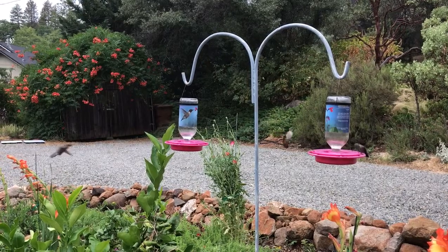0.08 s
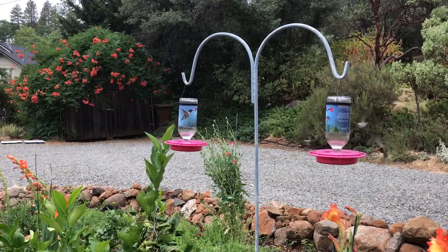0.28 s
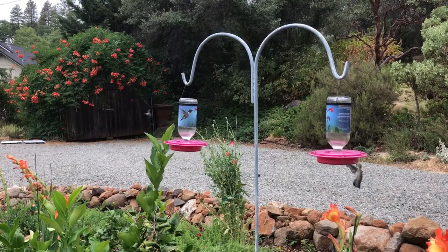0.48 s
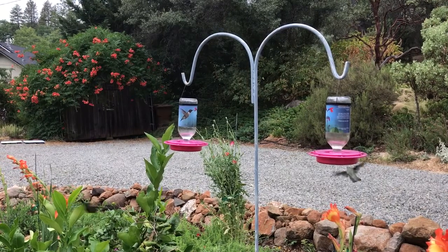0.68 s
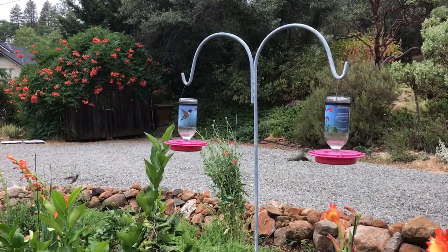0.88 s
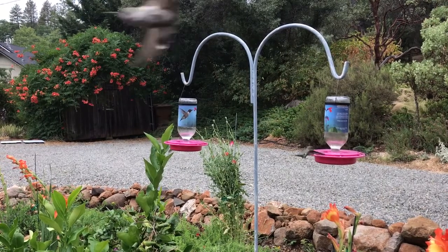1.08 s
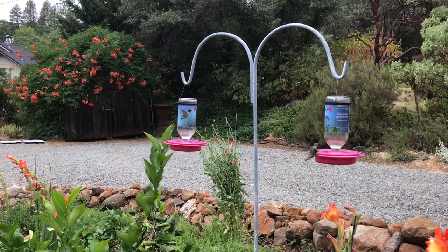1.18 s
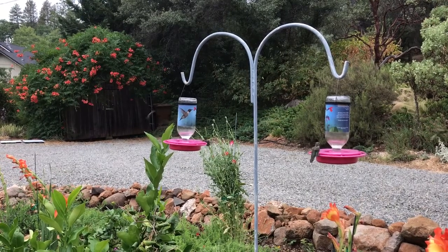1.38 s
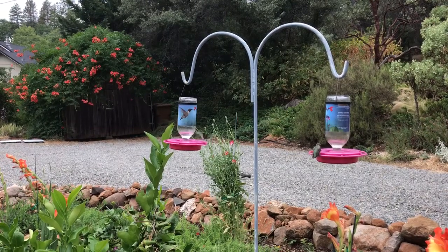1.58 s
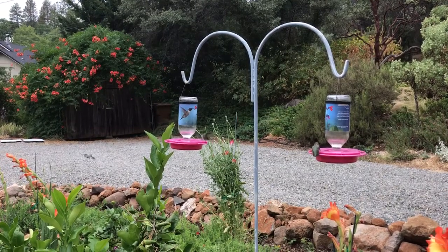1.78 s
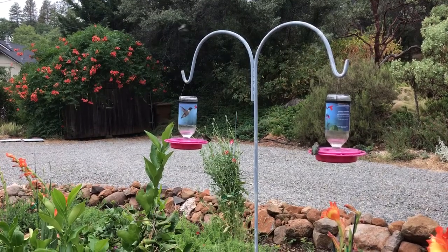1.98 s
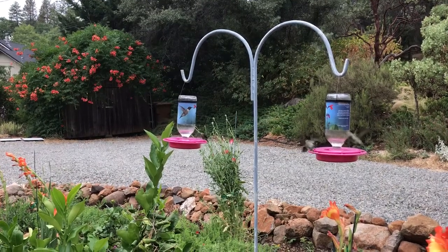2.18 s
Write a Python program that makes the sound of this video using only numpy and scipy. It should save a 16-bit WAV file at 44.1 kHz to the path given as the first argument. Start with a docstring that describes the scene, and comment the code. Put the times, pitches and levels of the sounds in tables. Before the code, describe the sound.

Hummingbirds chatter close by, opening with a thin chirp and a sharp squeal at 0.25 seconds. Rapid, high rattles and warbled chirps crowd together until 0.9, with one tiny dry tick near 0.5. Softer chirps and buzzes follow until 1.7, then one sharp chip at 1.85. Wings hum low throughout, loudest near 1.2 as a bird darts past. The calls echo faintly over a soft garden hush.

```python
"""Hummingbird chase at the feeders

Hummingbirds chase each other round garden feeders, close up and in mono. Their calls are thin
whistles swept very fast: warbled chirps, rattles, buzzes, a squeal and one sharp chip.
Wings hum throughout and swell as a bird darts past. Underneath lie a second bird's hover,
one dry tick and the soft hush of the garden, which gives the calls a faint echo."""
import sys
import numpy as np
from scipy import signal
from scipy.fft import rfft, irfft, next_fast_len
from scipy.io import wavfile
from scipy.ndimage import uniform_filter1d, map_coordinates

SR = 44100
rng = np.random.default_rng(int(sys.argv[2]) if len(sys.argv) > 2 else 0)


def digitize_waveform(pressure):
    """Quantize a signal to 16-bit integers and store it at the path in sys.argv[1].

    Rows of a 2-D input are taken as channels; values are limited to [-1, 1].
    """
    field = np.atleast_2d(pressure).T
    bounded = np.clip(field, -1, 1)
    quanta = np.round(bounded * 32767).astype(np.int16)
    wavfile.write(sys.argv[1], SR, quanta)


N = 97020
T = np.arange(N) / SR

# Colour of the garden's noise bed (frequency [Hz], gain [dB])
HUSH_EQ = [(25, -36), (45, -1.5), (85, 1), (170, -5.5), (270, -8.5), (400, -28), (550, -26), (1000, -21.5),
           (2000, -25.5), (4000, -27), (6500, -27.5), (8500, -32.5), (10500, -35), (13000, -31.5),
           (16000, -40)]
# Decay of the echo from the trees (frequency [Hz], time to fall 60 dB [s])
ECHO_DECAY = [(1000, 0.19), (7000, 0.64), (15000, 0.4)]
# Colour of that echo (frequency [Hz], gain [dB])
ECHO_EQ = [(1000, -15), (4000, 0), (6800, 1.5), (8800, 2.5), (11000, 1), (16000, -5)]
# Hum of the hovering bird (multiple of the stroke rate, level [dB])
HOVER_PARTIALS = [(1, -66), (2, -67.5), (3, -73.5)]
# Resonances of the tick (frequency [Hz], relative level [dB], time to fall 60 dB [s])
TICK_RESONANCES = [(950, -10, 0.014), (1070, -0.5, 0.014), (1840, -0.5, 0.013), (2360, 0, 0.011)]

# Wing speed, two strokes to a beat (time [s], stroke rate [Hz])
STROKE_RATE = [(0, 85), (.2, 83), (.32, 89), (.4, 93.6), (.49, 97.5), (.57, 106), (.68, 100.3), (.78, 106),
               (.87, 82.7), (.93, 89.5), (1.02, 98.5), (1.14, 84.2), (1.23, 95), (1.36, 89.5), (1.56, 80),
               (1.72, 90), (1.9, 79), (2.2, 87.5)]
# Wing faders, each ahead of a trim (time [s], stroke tone [dB], overtones and flutter [dB], swish [dB])
WING_FADERS = [(0, -63, -69, -70), (.1, -60.5, -66, -73), (.24, -74, -65, -69.5), (.39, -52, -56, -68),
               (.44, -58.5, -61.5, -67.5), (.6, -52, -53, -61.5), (.68, -51, -54, -66.5),
               (.79, -61.5, -66.5, -70), (.86, -47.5, -51, -61.5), (.92, -54, -57, -71.5),
               (.99, -49, -53.5, -65), (1.11, -62.5, -47.5, -58), (1.18, -40, -44.5, -61.5),
               (1.235, -42.5, -48.5, -63), (1.28, -67, -62, -76), (1.36, -66, -58.5, -71),
               (1.45, -66, -63, -71.5), (1.65, -55.5, -61, -72), (1.78, -68.5, -61, -72),
               (1.92, -69, -67.5, -72.5), (2.2, -67, -57.5, -72.5)]
# Unequal up- and downstrokes sound at half the stroke rate (time [s], fader ahead of a trim [dB])
BEAT_FADER = [(0.0, -81), (0.27, -72), (0.39, -63), (0.51, -73), (0.71, -60), (0.77, -81), (0.88, -49.5),
              (0.96, -78), (1.12, -67), (1.17, -48), (1.38, -84), (1.56, -61), (1.61, -73), (1.66, -64),
              (2.05, -83), (2.2, -64)]
# Upper partials of the wing hum (multiple of the stroke rate, relative level [dB])
WING_PARTIALS = [(1.5, -8), (2, -4), (2.5, -13.5), (3, -13), (3.5, -18), (4, -15.5)]
# Low flutter of the stirred air (frequency [Hz], gain [dB])
FLUTTER_EQ = [(40, -52), (110, -11.5), (160, 3.5), (280, -8.5), (420, -5.5), (700, -26), (2000, -116)]
# Broad swish of the stirred air (frequency [Hz], gain [dB])
SWISH_EQ = [(100, -33), (350, -11), (600, -6), (1400, -8.5), (3000, -12.5), (8000, -19), (16000, -21.5)]

# How strongly the beak radiates each partial (frequency [Hz], gain [dB])
BEAK_EQ = [(1200, 10), (3000, -4.5), (5000, -5), (6800, 0), (9000, -1), (10500, -9), (12500, -8.5),
           (16000, -21)]
# Hoarseness of the voice (frequency [Hz], gain [dB])
RASP_EQ = [(1200, -9), (2800, -18.5), (4500, -1.5), (6800, -4), (10000, -2), (12500, 0), (14000, -14),
           (16000, -13.5)]
# Harmonics of each call ahead of the beak, fundamental first (gain [dB])
BUZZ_HARMONICS = [-4, -6]
RATTLE_HARMONICS = [-1, -2, -0.5, -10]
CHIRP_HARMONICS = [-1.5, -6.5, -30]
SQUEAL_HARMONICS = [1, 2, 4]
CHIP_HARMONICS = [-2, -1.5, 1.5, -27]
# Buzz cues (time [s], length [s], top pitch [Hz], gain [dB])
BUZZ_CUES = [(.543, 0.037, 7130, -44), (0.901, 0.0308, 7107, -46), (1.066, 0.033, 6910, -48),
             (1.143, 0.048, 7000, -47.5), (1.327, 0.0354, 7000, -44.5), (1.517, 0.031, 6820, -50.5)]
# Rattle cues (time [s], length [s], sweep rate [Hz], low pitch [Hz], high pitch [Hz],
# final gain [dB], swell up to it [dB])
RATTLE_CUES = [(.2805, 0.026, 370, 2010, 6400, -49, -3.5), (.4395, 0.059, 155, 1402, 7600, -38.5, 12),
               (.5508, 0.019, 165, 1765, 7300, -40, 1), (.7068, .0675, 165, 1583, 7830, -38, 7.5),
               (.7935, 0.063, 175, 1576, 7495, -41.5, 16)]
# Chirp cues (time [s], hold [s], rest after the dip [s], length [s], held pitch [Hz],
# starting gain [dB], fade over the call [dB], sink of the warble [share of pitch])
CHIRP_CUES = [(.094, 0.0082, .004, .038, 8300, -43, 14.5, 0.36),
              (.434, .009, 0.00057, 0.032, 8680, -37.5, 10, 0.37),
              (.626, 0.0068, 0.0013, 0.067, 8710, -37, 13, .36),
              (0.808, 0.0056, 0.0078, 0.044, 8670, -45.5, 4, .25),
              (.981, 0.0058, 0.00038, 0.051, 8510, -43.5, 6.5, 0.29),
              (1.234, .0055, 0.0008, 0.061, 8605, -43, 8.5, .25),
              (1.409, 0.0082, 0.0044, 0.067, 8406, -45.5, 7.5, 0.25),
              (1.601, 0.0076, 0.0046, 0.057, 8200, -47.5, 5, 0.23)]
# The squeal, a held whistle that breaks downward (time [s], pitch [Hz], gain [dB])
SQUEAL_PATH = [(.226, 8180, -74), (.231, 9300, -38.5), (.238, 9410, -34.5), (.241, 8820, -33),
               (.243, 9430, -31), (.2462, 9430, -28.5), (.248, 7930, -32), (.2503, 9760, -34),
               (.2523, 5580, -40.5), (.2543, 9220, -39.5), (.2565, 4800, -36.5), (.2585, 3850, -41.5),
               (.261, 4870, -56)]
# The chip, one steep fall (time [s], pitch [Hz], gain [dB])
CHIP_PATH = [(1.837, 7010, -75), (1.842, 7780, -46), (1.845, 7550, -35.5), (1.8475, 6950, -32),
             (1.8495, 5600, -28.5), (1.851, 4000, -33), (1.8528, 2488, -46.5), (1.855, 1596, -67)]


def amp(db):
    """Decibels to gain."""
    return 10 ** (np.asarray(db) / 20)


def unit(x):
    """Scale to rms 1."""
    return x / np.sqrt(np.mean(x ** 2) + 1e-20)


def along(points, hz):
    """Read (frequency, value) points on a log axis."""
    knots_hz, values = np.transpose(points)
    return np.interp(np.log(np.abs(hz) + 1), np.log(knots_hz + 1), values)


def curves(rows, t):
    """Each column of an automation table at the times t."""
    times, *columns = np.transpose(rows)
    return [np.interp(t, times, column) for column in columns]


def wobble(rate, t):
    """A smooth random curve, rate knots a second."""
    return map_coordinates(rng.standard_normal(1024), [t * rate], mode="wrap")


def filtered(x, response):
    """Equalise x with a gain given as a function of frequency."""
    size = next_fast_len(N + 8192)
    return irfft(rfft(x, size) * response(np.fft.rfftfreq(size, 1 / SR)), size)[:N]


def noise(eq):
    """Coloured noise of rms 1."""
    return unit(filtered(rng.standard_normal(N), lambda hz: amp(along(eq, hz))))


def add(out, start, x):
    """Mix x in at start seconds."""
    i = max(0, round(start * SR))
    out[i:i + len(x)] += x[:N - i]


def fade(t, length, attack, release):
    """Linear fade in and out, times in seconds."""
    return np.clip(t / attack, 0, 1) * np.clip((length - t) / release, 0, 1)


def hush():
    """The garden's bed: soft, steady noise, strongest in the lows."""
    return amp(-62) * noise(HUSH_EQ)


def garden_echoes(x, scatter_t60=0.075):
    """Two returns: quick scatter from feeders and ground, and a longer echo from the trees."""
    hz, t, spectrum = signal.stft(rng.standard_normal(SR // 2), SR, nperseg=256)
    decay = amp(-60 * t / along(ECHO_DECAY, hz)[:, None])
    trees = signal.istft(spectrum * decay, SR, nperseg=256)[1]
    t = np.arange(len(trees)) / SR
    trees *= np.clip(t / 0.0073, 0, 1)
    scatter = rng.standard_normal(len(t)) * amp(-60 * t / scatter_t60) * np.clip(t / 0.0021, 0, 1)
    return [signal.fftconvolve(x, impulse / np.linalg.norm(impulse))[:N] for impulse in (scatter, trees)]


def hovering(stroke_hz=90.67):
    """The faint, steady wing hum of a second bird at a feeder."""
    phase = 2 * np.pi * np.cumsum(stroke_hz * (1 + .06 * wobble(5, T))) / SR
    return np.sqrt(2) * sum(amp(db + 2.3 * wobble(7.16, T)) * np.sin(k * phase)
                            for k, db in HOVER_PARTIALS)


def tick(start=.4675, gain_db=-47.5):
    """One small dry tick in the middle of the squabble."""
    out, t = np.zeros(N), np.arange(SR // 20) / SR
    for hz, db, t60 in TICK_RESONANCES:
        add(out, start, amp(gain_db + db - 60 * t / t60) * np.sin(2 * np.pi * hz * t))
    return out


def wings(stroke_swing_db=2.5, beat_swing_db=2):
    """Wing strokes hum, and each stroke pushes out a puff of stirred air."""
    stroke_hz, = curves(STROKE_RATE, T)
    tone_db, overtone_db, swish_db = curves(WING_FADERS, T)
    beat_db, = curves(BEAT_FADER, T)
    phase = 2 * np.pi * np.cumsum(stroke_hz) / SR
    hum = amp(tone_db - 1.5) * np.sin(phase + 0.42 * wobble(15, T))
    hum += amp(beat_db + 2.5) * np.sin(phase / 2 + 0.55 * wobble(5, T))
    for k, db in WING_PARTIALS:
        hum += amp(overtone_db + db + 1.9 * wobble(14, T)) * np.sin(k * phase + .5 * wobble(18, T))
    puffs = unit(amp(stroke_swing_db * np.cos(phase) + beat_swing_db * np.cos(phase / 2)))
    flutter = amp(overtone_db - 5.5) * noise(FLUTTER_EQ)
    swish = amp(swish_db + 1.5) * noise(SWISH_EQ)
    return np.sqrt(2) * hum + puffs * (flutter + swish)


def rasp(t, mid_db, growth_db=19.5):
    """Hoarse noise in the voice, growing towards the end of a call."""
    return amp(mid_db + growth_db * (t / t[-1] - .5)) * noise(RASP_EQ)[:len(t)]


def whistle(hz, harmonics, rough):
    """The syrinx: a slightly unsteady tone and its overtones, coloured by the beak."""
    hz = hz * (1 + rough * wobble(1500, np.arange(len(hz)) / SR))
    phase = 2 * np.pi * np.cumsum(hz) / SR
    return np.sqrt(2) * sum(amp(db + along(BEAK_EQ, k * hz)) * (k * hz < SR / 2) * np.sin(k * phase)
                            for k, db in enumerate(harmonics, 1))


def buzzes(trill_hz=330, trill_depth=0.18, tremolo_depth=.78):
    """Soft trills, loudest at the top of each little arch of pitch."""
    out = np.zeros(N)
    for start, length, top_hz, db in BUZZ_CUES:
        t = np.arange(int(length * SR)) / SR
        trough = np.sin(np.pi * (trill_hz * t + .08 * wobble(78, t))) ** 2
        sag = 0.104 * (2 * t / length - 1) ** 2  # both ends of the call go flat
        pitch = top_hz * (1 - trill_depth * trough) * (1 - sag)
        level = amp(db) * (1 - tremolo_depth * trough) * fade(t, length, attack=0.007, release=0.003)
        voice = whistle(pitch, BUZZ_HARMONICS, rough=0.032) + rasp(t, mid_db=-18)
        add(out, start, level * voice)
    return out


def rattles(duty=.8, arch_s=.0055, arch_fall=0.73, shimmer_db=1.2):
    """Rows of pulses that shoot up in pitch; the last of a row stays open and arches down again."""
    out = np.zeros(N)
    for start, length, rate, low_hz, high_hz, db, swell_db in RATTLE_CUES:
        t = np.arange(int(length * SR)) / SR
        last_pulse = np.floor((length - arch_s / 2) * rate - .5)
        pulses = t * rate + 0.044 * wobble(150, t)  # loose timing
        cycle = pulses - np.minimum(np.floor(pulses), last_pulse)
        sweep = np.clip(cycle / duty, 0, 1)
        arch = np.clip((t - (last_pulse + duty / 2) / rate) / arch_s, 0, 2)
        pitch = low_hz + (high_hz - low_hz) * np.sin(np.pi * sweep * .52)  # bends just over its top
        pitch *= 1 - arch_fall * np.minimum(arch, 1) ** 2
        pitch *= 1 + .04 * wobble(250.6, t)
        gate = np.where(arch > 0, np.exp(-arch ** 2), np.abs(np.sin(np.pi * sweep ** 1.03)))
        level = amp(db - swell_db * (1 - t / length) ** 2 + shimmer_db * wobble(307, t))
        level *= fade(t, length, attack=0.0015, release=0.006)
        voice = whistle(pitch, RATTLE_HARMONICS, rough=0.039) + rasp(t, mid_db=-11.5)
        add(out, start, level * gate * voice)
    return out


def chirps(warble_hz=272, warble_depth=.32, trough_db=-2, shimmer_db=1.2):
    """A held note dips once, springs back higher, then warbles while it sinks and fades."""
    dip_s, dip_ratio, rebound_ratio = 0.0079, .62, 1.085
    out = np.zeros(N)
    for start, hold, rest, length, hz, db, fade_db, sink in CHIRP_CUES:
        t = np.arange(int(length * SR)) / SR
        dip = np.clip((t - hold) / dip_s, 0, 1)
        top = np.where(dip < .5, 1, rebound_ratio)
        bend = top + (dip_ratio - top) * np.sin(np.pi * dip) ** 2
        warble_t = np.maximum(t - hold - dip_s - rest, 0)
        trough = np.sin(np.pi * warble_hz * warble_t * (1 + 0.028 * wobble(37.3, t))) ** 2
        descent = 1 - sink * (warble_t / warble_t[-1]) ** 0.77
        pitch = hz * bend * descent * (1 - warble_depth * trough)
        pitch *= 1 + .03 * wobble(327.7, t) * np.minimum(warble_t * warble_hz, 1)  # uneven warble
        level = amp(db - fade_db * t / length + trough_db * trough + shimmer_db * wobble(348, t))
        level *= fade(t, length, attack=0.0053, release=0.008)
        voice = whistle(pitch, CHIRP_HARMONICS, rough=.012) + rasp(t, mid_db=-15.5)
        add(out, start, level * voice)
    return out


def gliding_call(path, harmonics):
    """One loud whistle that rides its pitch and gain curves."""
    out = np.zeros(N)
    start, end = path[0][0], path[-1][0]
    hz, db = curves(path, np.arange(start, end, 1 / SR))
    pitch = uniform_filter1d(hz, size=30)  # round off the corners
    add(out, start, amp(db) * whistle(pitch, harmonics, rough=0.0044))
    return out


def scene():
    """Calls and their echoes over wings and hush; the closest calls barely reach the trees."""
    chatter = chirps() + rattles() + buzzes()
    squeal = gliding_call(SQUEAL_PATH, SQUEAL_HARMONICS)
    chip = gliding_call(CHIP_PATH, CHIP_HARMONICS)
    scatter, _ = garden_echoes(chatter + amp(-3) * squeal + chip)
    _, trees = garden_echoes(chatter + amp(-13.5) * squeal + amp(-27) * chip)
    trees = filtered(trees, lambda hz: amp(along(ECHO_EQ, hz)))
    calls = chatter + squeal + chip + amp(-14) * scatter + amp(-15.5) * trees
    mono = calls + wings() + hovering() + tick() + hush()
    return np.array([mono, mono])


def record(dry):
    """Master EQ: a steep low cut on the deepest rumble and a brick wall on the very top."""
    low_cut_hz, high_cut_hz = 35, 15950
    return np.array([filtered(x, lambda hz: (hz < high_cut_hz) * (1 - 1 / (1 + (hz / low_cut_hz) ** 8)))
                     for x in dry])


dry = scene()
out = record(dry)
digitize_waveform(out)
```